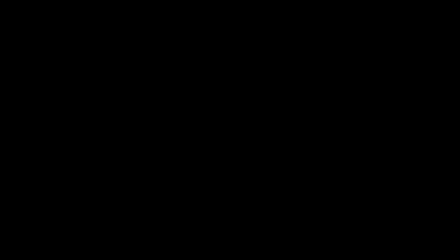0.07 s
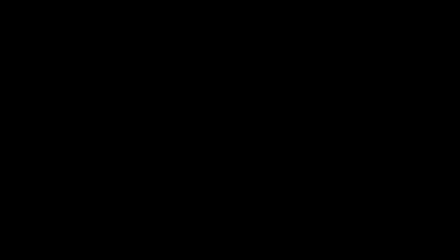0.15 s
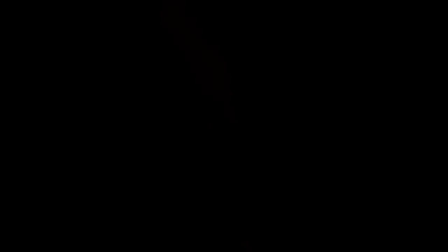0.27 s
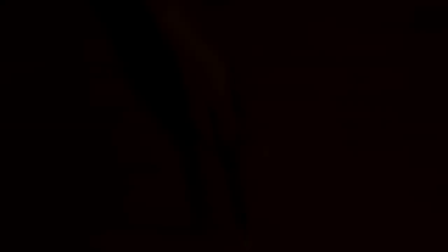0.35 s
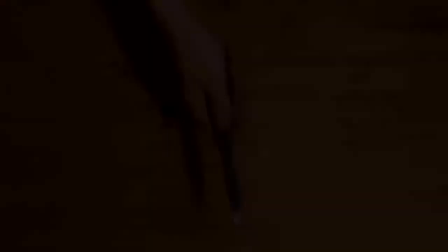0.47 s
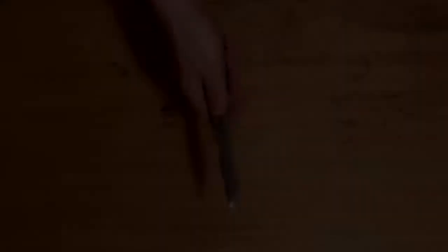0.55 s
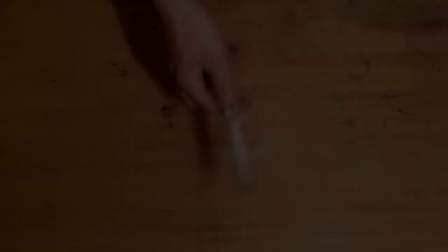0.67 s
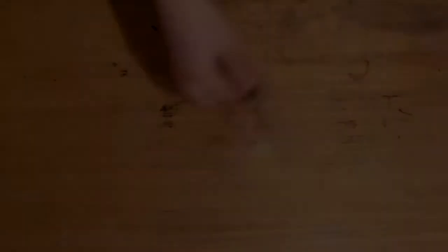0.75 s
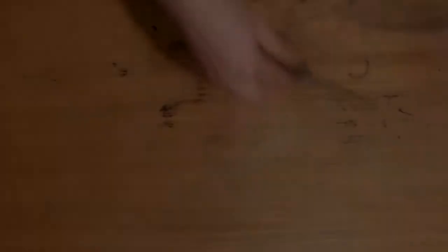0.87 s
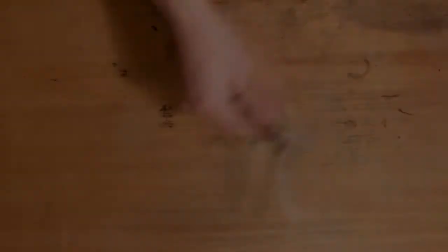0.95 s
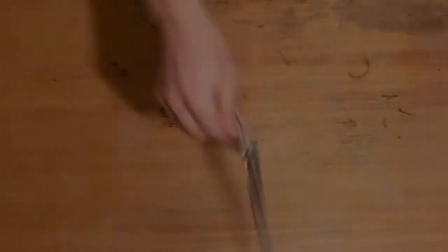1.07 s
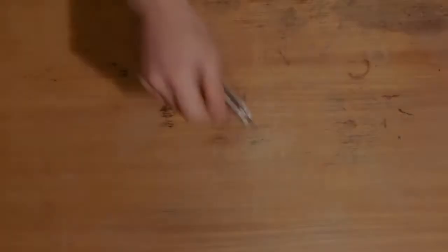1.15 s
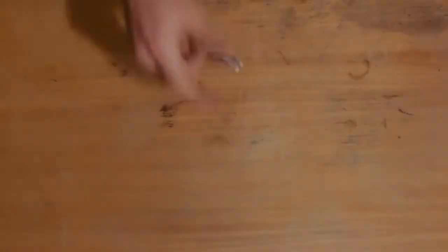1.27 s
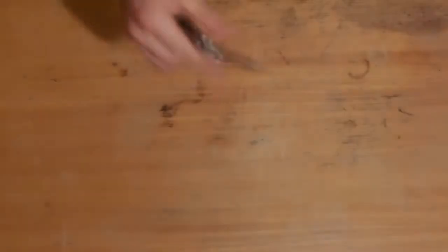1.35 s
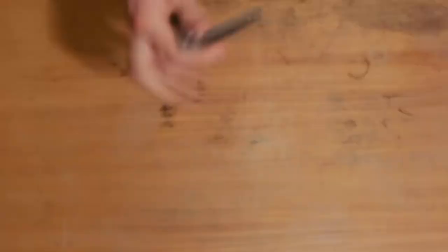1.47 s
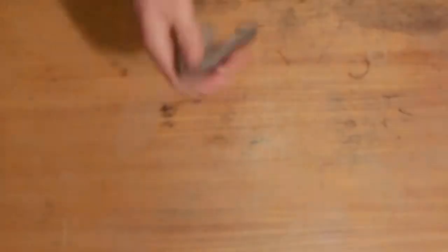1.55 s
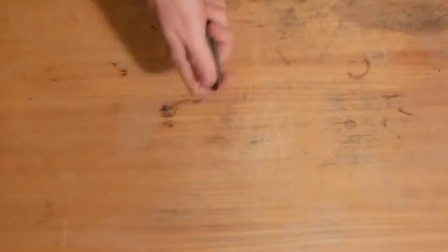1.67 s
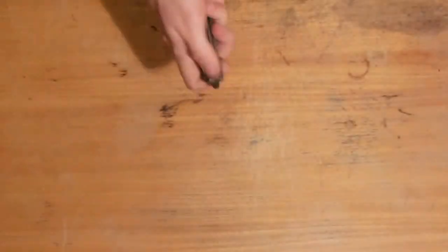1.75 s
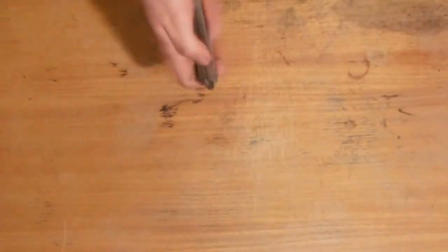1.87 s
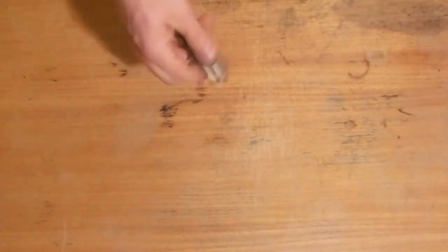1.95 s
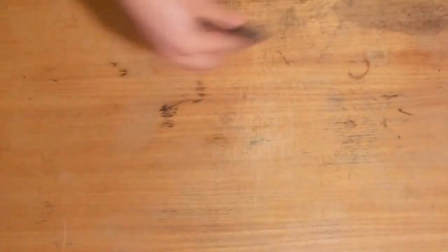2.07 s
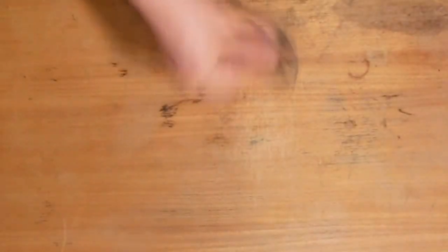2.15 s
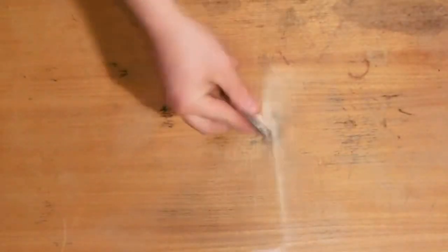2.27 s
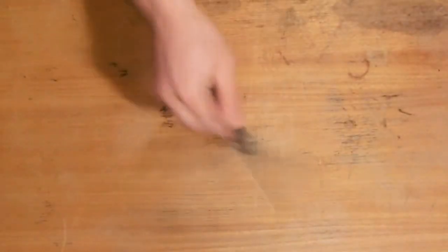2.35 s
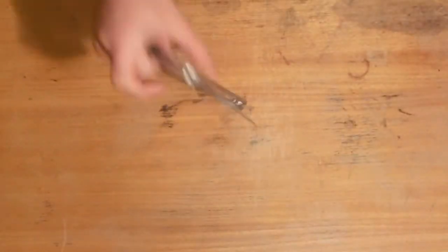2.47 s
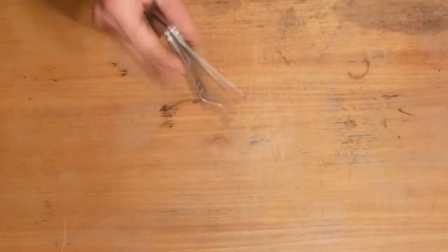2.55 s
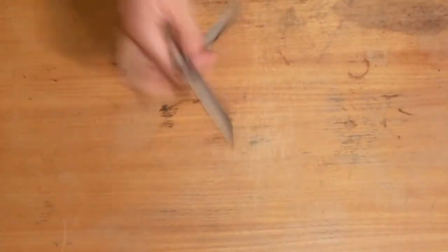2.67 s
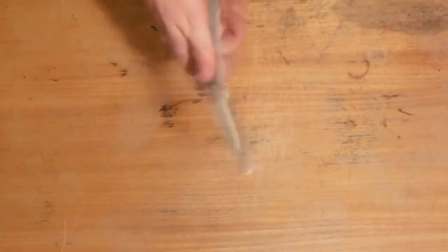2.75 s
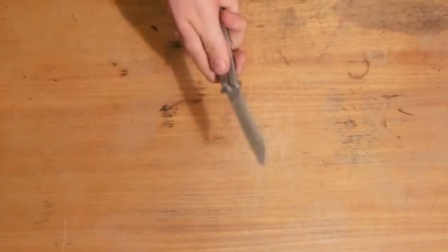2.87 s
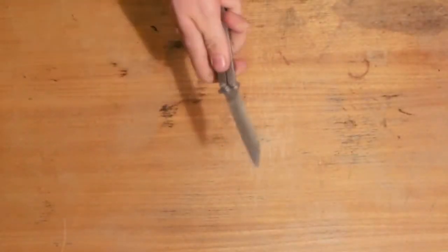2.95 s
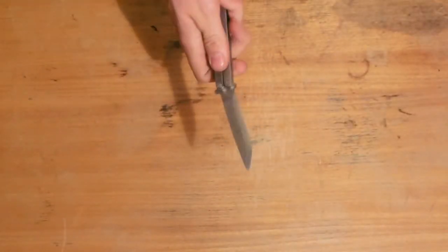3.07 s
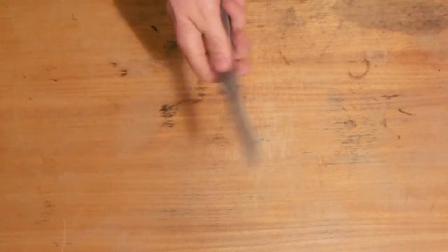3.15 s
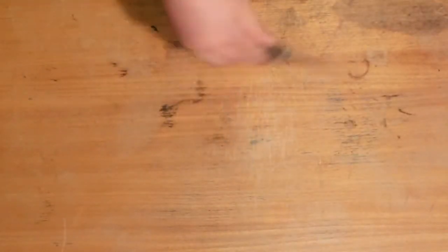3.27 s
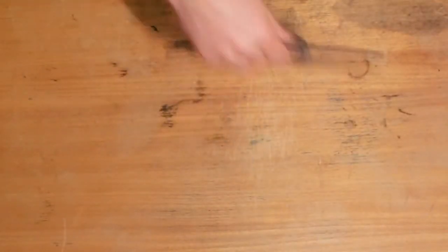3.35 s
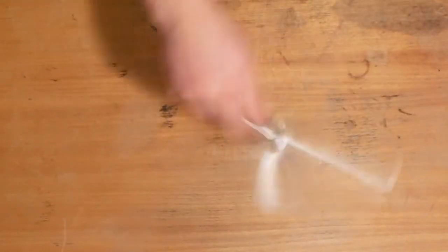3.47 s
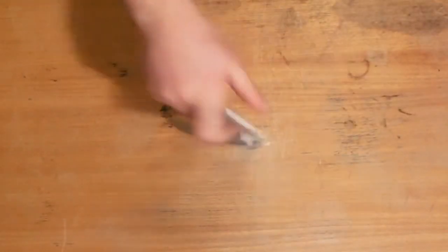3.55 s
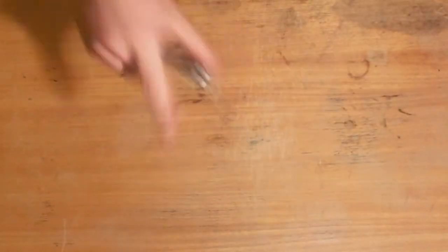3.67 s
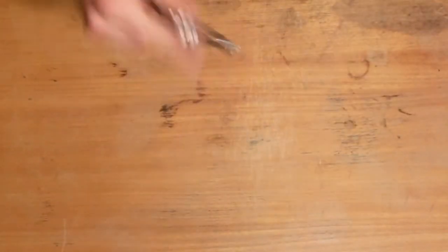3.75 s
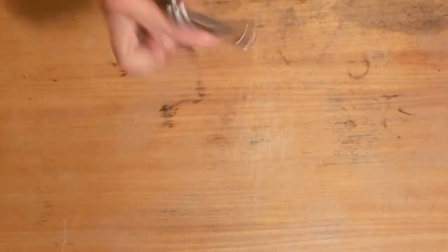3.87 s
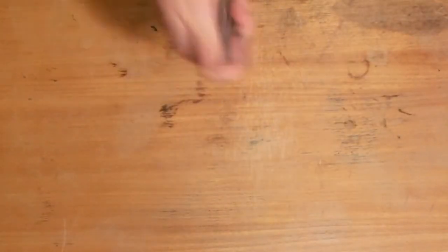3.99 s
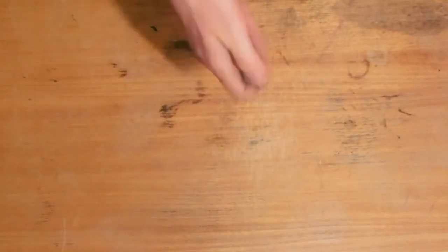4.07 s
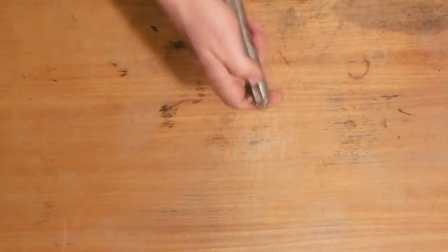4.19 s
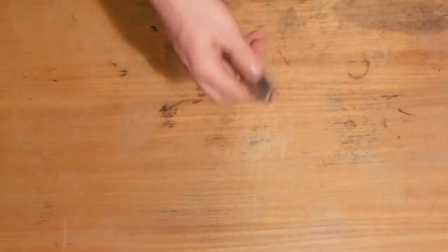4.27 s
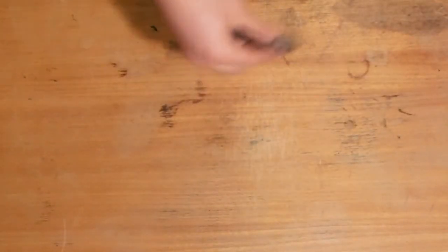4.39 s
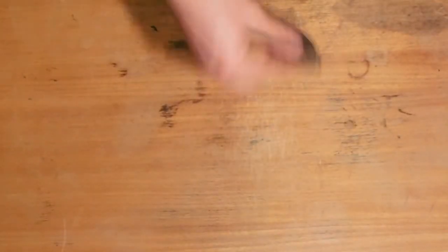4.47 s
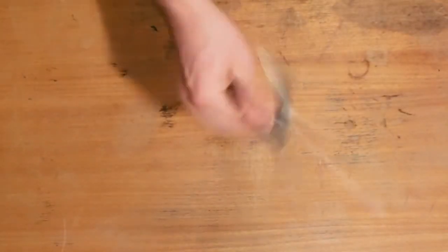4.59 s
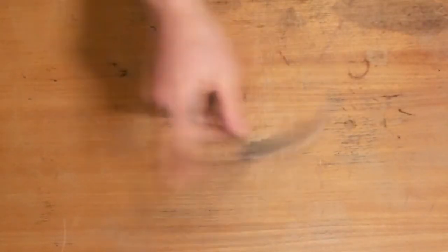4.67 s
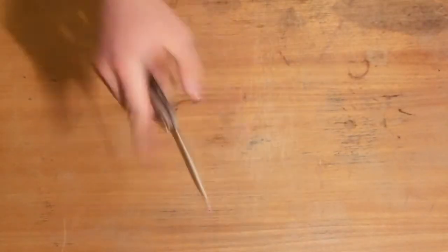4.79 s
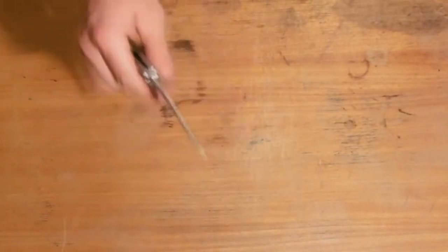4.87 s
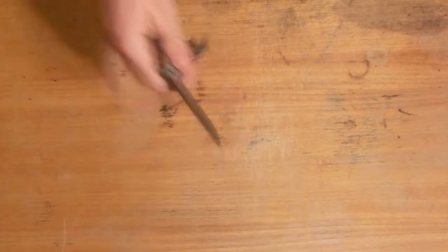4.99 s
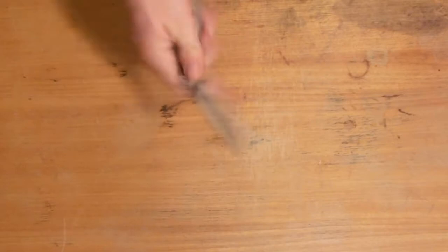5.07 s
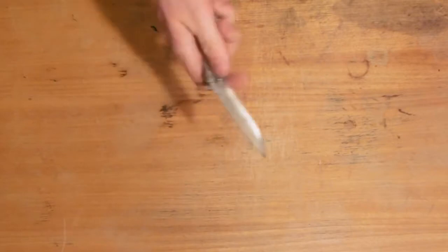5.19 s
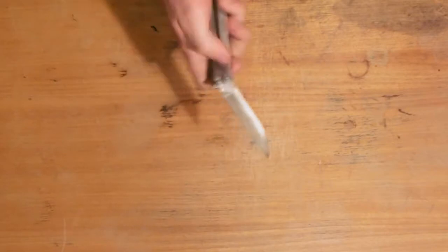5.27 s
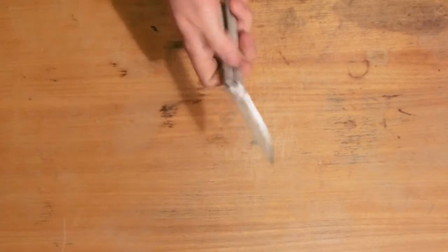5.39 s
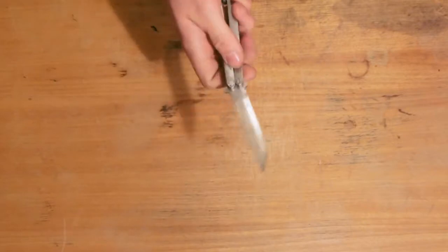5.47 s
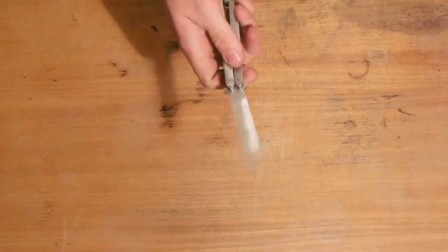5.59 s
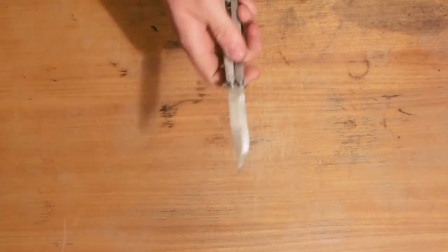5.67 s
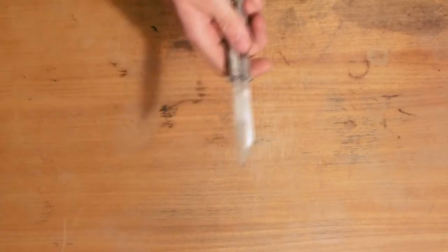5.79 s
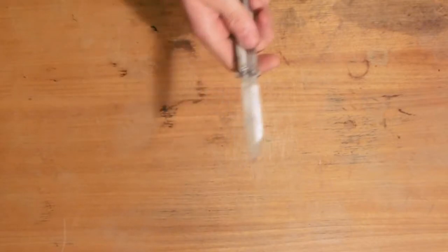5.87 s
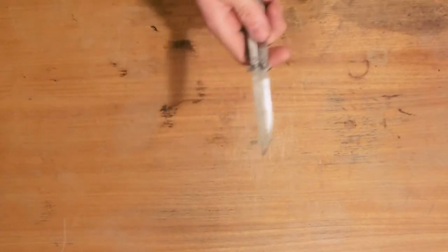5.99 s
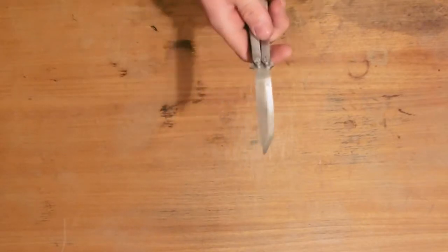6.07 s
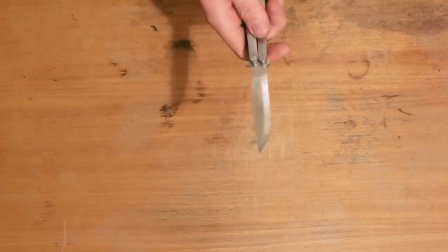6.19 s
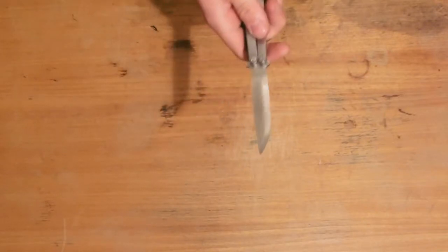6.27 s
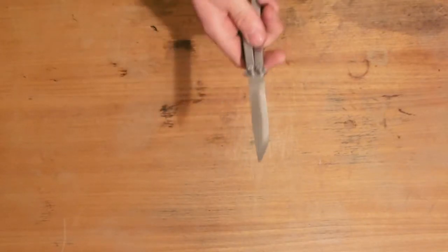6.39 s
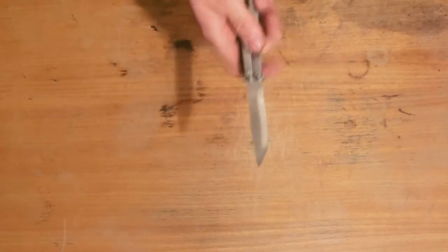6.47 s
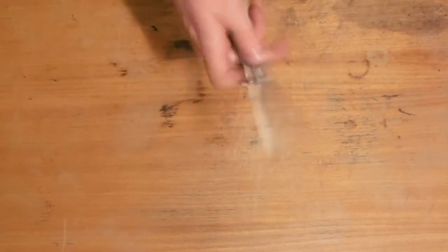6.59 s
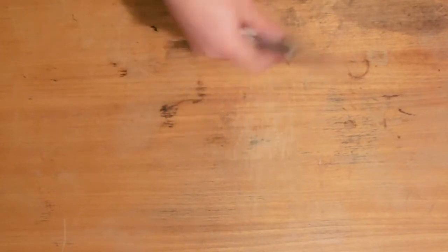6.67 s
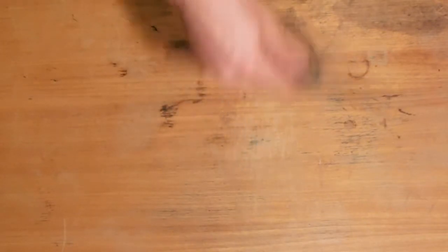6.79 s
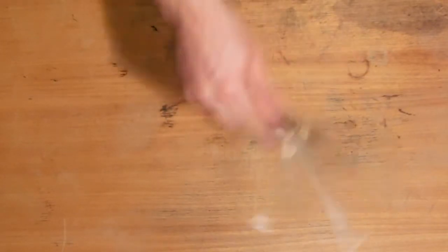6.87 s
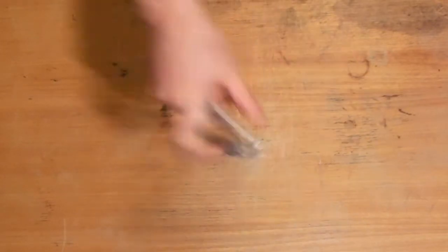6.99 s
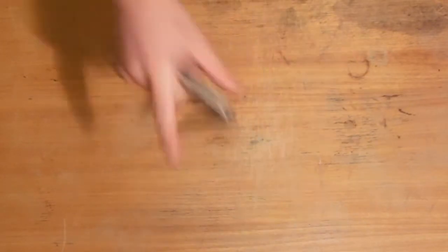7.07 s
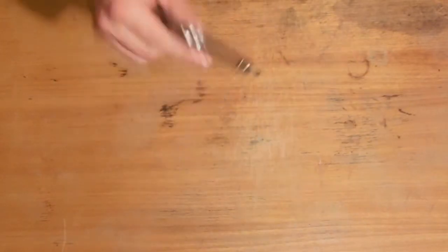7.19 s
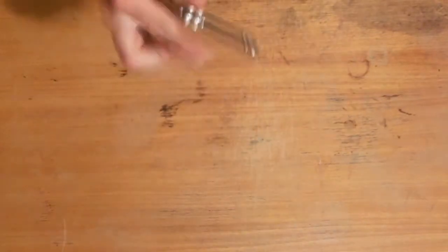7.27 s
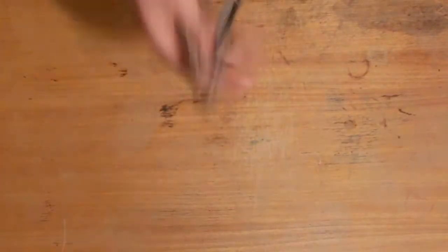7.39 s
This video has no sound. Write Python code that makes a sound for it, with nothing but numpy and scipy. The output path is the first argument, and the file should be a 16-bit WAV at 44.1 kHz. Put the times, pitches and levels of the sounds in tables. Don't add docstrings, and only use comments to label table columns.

```python
import sys
import numpy as np
from scipy import signal
from scipy.fft import rfft, irfft, next_fast_len
from scipy.io import wavfile
from scipy.ndimage import uniform_filter1d

SR = 44100
rng = np.random.default_rng(int(sys.argv[2]) if len(sys.argv) > 2 else 0)


def ratio(d):
    e = np.asarray(d, float) / 20
    return 10 ** e


def wav_out(sig):
    wavfile.write(sys.argv[1], SR, np.round(np.clip(np.atleast_2d(sig).T, -1, 1) * 32767).astype(np.int16))


N = 327663


def read(points, hz):
    f, value = np.transpose(points)
    return np.interp(np.log(hz + 1), np.log(f + 1), value)


def curve(rows, t):
    s, *columns = np.transpose(rows)
    return [np.interp(t, s, c) for c in columns]


def evened(x):
    return x / np.sqrt(np.mean(x ** 2) + 1e-20)


def add(mix, s, sound):
    part = mix[round(s * SR):][:len(sound)]
    part += sound[:len(part)]


def coloured(x, db_of):
    size = next_fast_len(len(x))
    gain = ratio(db_of(np.fft.rfftfreq(size, 1 / SR)))
    return irfft(rfft(x, size) * gain, size)[:len(x)]


def mode(t, hz, t60):
    return np.sin(2 * np.pi * hz * t) * ratio(-60 * t / np.clip(t60, .003, 1))


def ring(drive, t, hz, db, t60):
    response = (ratio(db) * mode(t, hz, t60)).sum(0)
    return evened(signal.fftconvolve(drive, response)[:len(t)])


def chatter(noise, t):
    bounce_db, swell_s = 2.5, .0027
    bounces = ratio(bounce_db * evened(uniform_filter1d(noise[1], size=40)))
    return noise[0] * bounces * (t / swell_s) ** 2 * np.exp(-t / swell_s)


def ping(db, hz, t60, grit):
    t = np.arange(grit.shape[1]) / SR
    sound = ring(chatter(grit, t), t, hz * np.array([[1], [1.012]]), 0, t60)
    return ratio(db - 8.5) * sound / abs(sound).max()


# (time [s], level [dB])
GAIN = [(0.0, -82.5), (0.14, -73), (0.33, -68), (0.89, -62), (1.45, -60), (1.63, -65.5), (2.07, -66.5),
        (2.73, -67.5), (3.81, -65.5), (4.82, -66), (5.94, -66), (7.43, -61)]


def gain_db():
    return curve(GAIN, np.arange(N) / SR)[0]


# (frequency [Hz], density [dB per Hz])
HISS = [(59, -57), (100, -4), (119, -3), (322, -4), (425, -3), (955, -2), (1110, -2.5), (1530, -3),
        (3010, -5), (11800, -13.5), (16200, -18.5)]


def hiss(level_db):
    noise = evened(coloured(rng.standard_normal(N), lambda hz: read(HISS, hz)))
    treble = coloured(noise, lambda hz: 20 * np.log10(hz / (hz + 4000) + 1e-9))
    return ratio(level_db + 8.5) * (noise + (ratio(-5) - 1) * treble)


# (frequency [Hz], density [dB per Hz])
RUMBLE = [(12, -43), (20, 12), (32, -7), (53, 15), (72, 3.5), (86, -22), (108, -3), (124, 10), (140, -57),
          (168, 6.5), (220, 4), (290, -20), (480, -120)]
# (start [s], length [s], lift [dB])
SURGES = [
    (0.35, 0.5, 4.5),
    (1.7, 0.59, 7.5),
    (3.347, 0.79, 4.5),
    (4.35, .45, 3.5),
    (5.4, 0.27, 2.5),
]


def rumble(level_db):
    swell_db, swell_s = 0.5, .15
    noise, drift = rng.standard_normal((2, N))
    noise = evened(coloured(noise, lambda hz: read(RUMBLE, hz)))
    drift = evened(coloured(drift - drift.mean(), lambda hz: -20 * np.log10(1 + (hz * swell_s) ** 2)))
    surge_db = np.zeros(N)
    for s, length, db in SURGES:
        add(surge_db, s, db * signal.windows.tukey(round(length * SR), .6))
    return ratio(surge_db - 75 + level_db + 65 + swell_db * drift) * noise


# (start [s], length [s], level [dB])
THROBS = [
    (0.49, 0.063, -63.5),
    (0.829, 0.045, -57.5),
    (0.906, 0.19, -62.5),
    (1.115, 0.22, -60),
    (1.27, 0.19, -63),
    (1.52, 0.12, -60),
    (1.67, 0.064, -63),
    (1.79, 0.077, -63.5),
]


def drone():
    centre_hz, width_hz = 386, 61
    tone = evened(coloured(rng.standard_normal(N),
                           lambda hz: -20 * np.log10(1 + (2 * (hz - centre_hz) / width_hz) ** 2)))
    throb = np.zeros(N)
    for s, length, db in THROBS:
        add(throb, s, ratio(db) * signal.windows.tukey(round(length * SR), .7))
    return throb * tone


# (time [s], peak [dB], leading ring [Hz], handle knock [dB], room share [dB])
SNAPS_EARLY = [(0.9768, -35.5, 2000, -6, -12), (1.0929, -32.5, 2220, -10, 2.5),
               (1.1105, -25, 4860, -7, 1.5), (1.2457, -38.5, 6000, -21, -1),
               (1.3738, -30.5, 4800, -27, -3.5), (1.4552, -26, 1650, -14.5, 0.5),
               (1.527, -24, 4700, -11.5, 3), (1.637, -5.5, 4820, -26, -6.5), (1.9181, -26, 5230, -16, -3),
               (1.9686, -24.5, 5400, -12.5, -3), (2.151, -39, 2610, -11, -0.5), (2.379, -26, 1250, -9, -2),
               (2.655, -31.5, 3970, -8.5, -4.5), (2.7453, -15.5, 5330, -12, -1.5),
               (3.249, -40.5, 5300, -25, -5), (3.3575, -43.5, 2270, -22, 3), (3.4212, -36, 3660, -9, -5),
               (3.6156, -36.5, 4550, -9, -6), (3.688, -35.5, 5700, -19, -3), (3.795, -35, 1530, -7.5, -2.5)]
SNAPS_LATE = [(3.9634, -27, 2300, -8, -5), (3.986, -28, 3750, -11, 4), (4.0107, -8.5, 4840, -30, -18),
              (4.2227, -39, 5800, -37, -1), (4.2802, -33, 5730, -13, -1), (4.326, -38, 3400, -25, -10),
              (4.4684, -34, 2100, -14, -6.5), (4.5591, -25.5, 1470, -10, -4), (4.75, -41, 6140, 0, -3),
              (4.8036, -32, 6050, -14, 1), (4.9973, -36, 2250, -31, 1), (5.086, -18.5, 4970, -14.5, -4),
              (6.556, -47, 1100, -15, -8), (6.6876, -39, 6800, -7, -1), (6.9394, -34.5, 4870, -4, -1.5),
              (7.1783, -36, 6000, -21, -5), (7.274, -43, 4730, -21, 0), (7.394, -34, 3400, -36, 0)]
# (time [s], peak [dB], leading
# ring [Hz], room share [dB])
FURTHER_CONTACTS = [(0.8157, -37.5, 3570, 0), (1.2997, -26.5, 1840, -1), (1.4708, -30.5, 1970, -7),
                    (1.5715, -22.5, 1260, -2.5), (1.6005, -19.5, 4360, 3), (1.6271, -21, 4460, 3),
                    (1.8344, -46, 4100, -17), (2.276, -41, 3070, -4), (2.3214, -45, 3050, -1),
                    (2.498, -49.5, 2220, 10), (2.5175, -40.5, 2130, -1.5), (2.574, -39.5, 3500, -3),
                    (2.719, -44.5, 1910, 11), (3.3708, -44, 2050, -13), (3.54, -46.5, 1380, 6),
                    (2.738, -28, 5000, -13), (3.6364, -38, 4300, -3), (3.854, -43.5, 3600, 5.5),
                    (4.5952, -30.5, 1420, -2.5), (4.6541, -40, 2476, -1.5), (4.8871, -32.5, 7000, -1),
                    (5.124, -25.5, 2450, -8), (5.328, -43.5, 2090, -7), (5.078, -38, 4630, -11),
                    (6.8604, -38.5, 1280, -3), (7.0092, -41, 4550, -11), (7.099, -47, 1110, -5),
                    (7.216, -43, 1210, -7), (7.3078, -36, 3720, 3), (7.4224, -29, 5580, -4)]
EDGE_DB = {"handle": -9.5, "blade": -4, "slam": -4.5}
FURTHER_KNOCK_DB = {"handle": -11, "blade": -13.5}


def contacts():
    handle_top_hz, slam_db = 2500, -21

    def part(hz):
        return "handle" if hz < handle_top_hz else "blade"

    rattles = [(s, db, hz, FURTHER_KNOCK_DB[part(hz)], wet) for s, db, hz, wet in FURTHER_CONTACTS]
    return [(s, db, hz, knock, EDGE_DB["slam" if db > slam_db else part(hz)], wet)
            for s, db, hz, knock, wet in SNAPS_EARLY + SNAPS_LATE + rattles]


# (frequency [Hz], width [Hz], level [dB])
STEEL = [(3520, 70, 0), (3800, 90, -6), (4330, 80, -4), (4550, 100, 0), (4730, 90, -3), (5140, 80, -3),
         (5380, 80, -4), (5720, 90, -6), (6150, 100, -8), (6810, 100, -4), (7250, 100, -7), (8030, 100, -5),
         (8400, 100, -5), (9000, 100, -3), (9450, 100, -8), (9860, 100, -4), (10500, 90, -2),
         (11500, 110, -8), (12320, 110, -6), (13360, 120, -11), (14300, 130, -12), (15200, 130, -8)]
# (frequency [Hz], width [Hz], level [dB])
HANDLES = [(1260, 70, -2), (1420, 70, -4), (1620, 70, 0), (1900, 80, -1), (2250, 80, -2), (2650, 90, -5),
           (3050, 90, -5)]
# (frequency [Hz], density [dB per Hz])
CRACK = [(410, -70.5), (700, -69), (1530, -3), (3210, -27), (3420, -50), (4560, 3.5), (6150, 5.5),
         (6740, 4.5), (10200, 3), (14700, -13.5), (15700, 1.5)]


def clack(row, luck, noise):
    scatter_db, held = 3.2, .6
    _, peak_db, lead_hz, knock_db, edge_db, _ = row
    t = np.arange(noise.shape[1]) / SR
    drive = chatter(noise, t)
    sound = evened(coloured(drive, lambda hz: read(CRACK, hz)))
    for modes, set_db, chance in (STEEL, -8, luck), (HANDLES, -4, luck[::-1]):
        hz, width, db = np.transpose(modes)[:, :, None]
        strength_db = db + scatter_db * chance[:len(modes), None]
        sound = sound + ratio(set_db) * ring(drive, t, hz, strength_db, held * 3.4 / width)
    cluster_hz = lead_hz * np.array([[.93], [1], [1.07]])
    sound = sound + ratio(-6) * ring(drive, t, cluster_hz, np.array([[-4], [0], [-4]]), .014)
    grip = [(500, knock_db - 42), (1150, knock_db + 0.5), (2400, knock_db + 10), (3400, 0.0055),
            (5800, 0), (7800, edge_db + 9), (16000, edge_db + 17)]
    sound = coloured(np.roll(sound, 200), lambda hz: read(grip, hz))[200:]
    return ratio(peak_db) * sound / np.sqrt(uniform_filter1d(sound ** 2, size=130).max() * 6)


def clacks():
    direct, feed, rows = np.zeros(N), np.zeros((3, N)), contacts()
    luck = rng.standard_normal((len(rows), 3, len(STEEL)))
    noise = rng.standard_normal((len(rows), 3, 2, 1800))
    for k, row in enumerate(rows):
        draws = [clack(row, *pair) for pair in zip(luck[k], noise[k])]
        start = row[0] - .003
        add(direct, start, draws[0])
        for wall, sound in zip(feed, draws):
            add(wall, start, ratio(row[5]) * sound / np.sqrt(3))
    return direct, feed


# (frequency [Hz], reverberation time [s])
ROOM = [(1000, 0.2), (2600, 0.27), (7000, 0.2), (15000, 0.15)]


def room(count, gap=0.001, build=0.013):
    signs = rng.choice([-1., 1.], (count, SR // 2))
    taps = signs * (rng.random((count, SR // 2)) < .12)
    hz, t, z = signal.stft(taps, SR, nperseg=128)
    tail = signal.istft(z * ratio(-60 * t / read(ROOM, hz)[:, None]), SR, nperseg=128)[1]
    t = np.arange(tail.shape[1]) / SR
    tail = tail * np.clip((t - gap) / build, 0, 1)
    return tail / np.linalg.norm(tail, axis=1, keepdims=True)


# (time [s], peak [dB], ringing [Hz])
TICKS = [(1.108, -33, 6800), (1.114, -29, 6890), (1.1198, -25, 9860), (1.244, -45, 9650),
         (1.2484, -40, 10160), (1.2966, -39, 3700), (1.311, -32, 9690), (1.3147, -36, 5700),
         (1.4507, -45, 5000), (1.4712, -34, 4800), (1.528, -31, 8960), (1.555, -32, 4570),
         (1.5587, -33, 5300), (1.62, -31, 8600), (1.6376, -18, 4590), (1.6402, -18, 8100),
         (1.7329, -40, 3600), (1.9152, -39, 9050), (1.9201, -27.5, 10080), (1.963, -36, 6600),
         (1.9727, -30.5, 10330), (1.9889, -40, 6600), (2.3873, -29.5, 8700), (2.4043, -38, 3660),
         (2.6566, -39, 7360), (2.6638, -34.5, 8830), (2.7428, -29, 9050), (2.747, -23, 9400),
         (2.7522, -29, 7200), (2.7917, -29, 5730), (3.69, -42, 8570), (3.8096, -42, 5080),
         (3.9737, -33, 10380), (3.99, -31, 10400), (4.0079, -23, 4500), (4.0124, -16.5, 8850),
         (4.0177, -23, 10400), (4.0256, -24, 5070), (4.22, -42, 9950), (4.2244, -36.5, 11500),
         (4.282, -38, 11100), (4.2908, -42, 9000), (4.4685, -40, 10700), (4.4732, -37.5, 9000),
         (4.5596, -27.5, 7500), (4.8038, -37, 8440), (4.8818, -46, 12060), (4.8961, -42, 9100),
         (4.9993, -41, 12300), (5.0045, -42, 10420), (5.0876, -21, 9050), (5.0915, -27, 4700),
         (6.686, -38, 6850), (6.693, -36.5, 6850), (6.865, -44, 8440), (6.9397, -35.5, 15200),
         (7.3102, -44, 10400), (7.3232, -43, 5400), (7.3898, -40, 8610), (7.3944, -29.5, 8800)]
# (frequency [Hz], gain [dB])
TICK_COLOUR = [(500, -80), (1400, -42), (3000, -10), (5000, -2), (9500, -3), (13000, -6), (16000, -10)]


def touches():
    rise_s, fall_s, t60, ring_db = .0003, .0019, .018, 1.5
    out, t = np.zeros(N), np.arange(1024) / SR
    for (s, db, hz), grit in zip(TICKS, rng.standard_normal((len(TICKS), len(t)))):
        drive = np.roll(grit * np.tanh(t / rise_s) * np.exp(-t / fall_s), shift=132)
        spot_hz = hz * np.array([[.975], [1], [1.03]])
        spot = ring(drive, t, spot_hz, np.array([[-5], [0], [-5]]), t60)
        tick = coloured(evened(drive) + ratio(ring_db) * spot, lambda f: read(TICK_COLOUR, f))
        add(out, s - .004, ratio(db) * tick / np.sqrt(2 * uniform_filter1d(tick ** 2, size=40).max()))
    return out


# (time [s], peak [dB], frequency [Hz])
PINGS = [(1.113, -19, 6810), (1.247, -34, 9860), (1.3733, -37, 10160), (1.5696, -26, 6640),
         (1.631, -16, 10300), (1.6376, -18, 10650), (1.917, -25, 10000), (2.6624, -39, 8620),
         (2.7184, -35, 10500), (2.7456, -17, 7060), (3.4213, -37, 9300), (3.6157, -37, 7630),
         (3.6885, -42, 8400), (3.9607, -28, 6800), (4.01, -30, 6600), (4.3256, -39, 9900),
         (4.4699, -26, 10500), (4.5597, -22, 10380), (4.7491, -35, 6400), (4.998, -33, 10500),
         (5.0854, -22.5, 8560), (5.1208, -32, 9000), (6.5555, -38, 10400), (6.6875, -28, 6830),
         (6.9217, -40, 10400), (6.939, -33, 12300), (7.177, -33, 10000), (7.2704, -33.5, 8930),
         (7.3926, -25, 8360)]
# (time [s], peak [dB], frequency [Hz])
LONG_PINGS = [
    (1.3, -31, 9500),
    (1.9709, -30.5, 6590),
    (2.7695, -34, 8770),
    (4.886, -34, 8920),
]
# (time [s], peak [dB], frequency [Hz], decay t60 [s])
RINGS = [(1.641, -15, 3510, 0.099), (2.751, -29, 4800, 0.23), (3.985, -19.5, 3700, 0.033),
         (3.963, -24.5, 3520, 0.07), (1.641, -15.5, 4530, 0.089), (3.421, -40, 3660, 0.045),
         (4.01, -13.5, 4530, 0.062), (4.4707, -31, 10630, .042), (4.5581, -23, 7410, .024),
         (4.6565, -37, 8790, .11), (4.9945, -35.5, 2285, .041), (7.0105, -39, 4540, .055),
         (7.0975, -41, 6040, .052), (7.2715, -43, 4685, .065), (2.3, -41, 11000, .06),
         (3.366, -40, 15000, 0.035), (4.223, -35, 5780, 0.12), (4.2228, -22, 9970, 0.014),
         (4.559, -29, 1930, 0.019), (7.5, -45, 9400, 0.05), (7.1, -37.5, 8440, 0.05),
         (6.942, -40, 6000, .03), (6.688, -37.5, 2040, 0.044), (1.302, -29.5, 1575, 0.16),
         (4.017, -16.5, 5200, 0.059)]


def pings():
    direct, feed = np.zeros(N), np.zeros((3, N))
    rows = [(*row, 0.03) for row in PINGS] + [(*row, 0.12) for row in LONG_PINGS] + RINGS
    for k, ((s, db, hz, t60), grit) in enumerate(zip(rows, rng.standard_normal((len(rows), 2, 4096)))):
        sound = ping(db, hz, t60, grit)
        add(direct, s - .003, sound)
        add(feed[k % 3], s - .003, ratio(-10) * sound)
    return direct, feed


# (time [s], peak [dB], frequency [Hz], decay t60 [s])
MORE_RINGS = [(1.133, -30.5, 10500, 0.13), (1.135, -33, 14900, .07), (1.301, -31, 5700, 0.076),
              (1.53, -33, 10560, .1), (1.645, -22, 10480, 0.19), (1.658, -23, 3510, .15),
              (1.966, -29, 14100, .13), (1.99, -35, 10100, 0.093), (2.151, -40, 10500, .06),
              (2.155, -42, 6900, .06), (2.719, -38, 8900, .06), (2.772, -26, 5700, .1),
              (2.79, -28, 5620, .1), (2.801, -36, 9040, 0.16), (3.252, -43, 10500, 0.091),
              (3.253, -41, 8600, .04), (3.45, -49, 10500, .1), (3.54, -49, 10500, .12),
              (3.568, -46, 5640, .08), (3.797, -41, 9870, .04), (3.797, -44, 6720, .07),
              (3.998, -31, 3800, .04), (3.975, -29, 6800, .15), (4.016, -24, 6770, .08),
              (4.293, -41, 5400, .09), (4.282, -42, 14500, .08), (4.47, -36, 12400, 0.14),
              (4.5, -45, 9000, .08), (5.015, -36, 15200, .07), (5.09, -26, 10450, .1),
              (6.862, -47, 10800, 0.11), (6.94, -40, 10500, .06), (7.008, -44, 8500, .06),
              (7.2, -44, 10540, .06), (7.212, -39, 8900, .04), (7.271, -42, 10800, .06),
              (7.312, -44, 10700, .09), (7.396, -36, 12300, .06), (1.31, -33, 2000, .08),
              (1.458, -37, 1950, .06), (2.382, -33, 1900, .07), (2.39, -35, 3600, .09),
              (2.747, -29, 1640, .07), (4.562, -36, 1330, .08), (1.655, -24, 5370, .1),
              (1.645, -25, 6500, .08), (4.05, -30, 5400, .06), (5.124, -30, 3700, .04)]


def more_rings():
    out = np.zeros(N)
    for (s, *row), grit in zip(MORE_RINGS, rng.standard_normal((len(MORE_RINGS), 2, 5000))):
        add(out, s - .003, ping(*row, grit))
    return out


# (time [s], level [dB], frequency [Hz], decay t60 [s])
THUDS = [
    (1.633, -49, 151, 0.033),
    (3.066, -61, 566, 0.24),
    (7.191, -59, 300, 0.28),
]


def thuds():
    out = np.zeros(N)
    for s, db, hz, t60 in THUDS:
        add(out, s, ratio(db) * mode(np.arange(8000) / SR, hz, t60))
    return out


# (frequency over centre [ratio], density [dB per Hz])
LATCH = [(0.3, -35), (0.6, -8), (0.85, -5.5), (1.02, -3), (1.2, -7.5), (1.9, -13.5), (2.5, -19), (3.5, -11)]
# (start [s], level [dB], held [s], centre [Hz])
LATCH_RATTLES = [
    (1.649, -32.5, 0.024, 4760),
    (2.757, -39.5, 0.054, 5540),
    (4.022, -35.5, 0.016, 4600),
    (5.115, -41.5, 0.013, 5170),
]


def latch():
    ticks_per_s, sizes_db, rise_s, t60 = 5000, 2.2, 0.01, 0.12
    out, t = np.zeros(N), np.arange(6000) / SR
    chances = rng.random((len(LATCH_RATTLES), 3, len(t)))
    for (s, db, held, centre_hz), (when, size, sign) in zip(LATCH_RATTLES, chances):
        sizes = ratio(-sizes_db * np.log(size + 1e-3))
        ticks = (when < ticks_per_s / SR) * sizes * np.sign(sign - .5)
        spray = evened(coloured(ticks, lambda hz: read(LATCH, hz / centre_hz)))
        fall = ratio(db - 60 * np.maximum(t - held, 0) / t60)
        add(out, s, fall * np.minimum(t / rise_s, 1) * spray)
    return out


# (time [s], pitch [Hz], level [dB])
SQUEAK = [
    (2.2, 3030, -70),
    (2.21, 3024, -52),
    (2.228, 3050, -48),
    (2.24, 3070, -51),
    (2.256, 3068, -41.5),
    (2.285, 3055, -55),
    (2.298, 3060, -79),
    (2.312, 3060, -49),
    (2.33, 3080, -64),
]
# (multiple [ratio], level [dB])
SQUEAK_ORDERS = [(1, -1.5), (2, -17), (3, -19), (4, -17)]


def squeak():
    t = np.arange(SQUEAK[0][0], SQUEAK[-1][0], 1 / SR)
    hz, db = curve(SQUEAK, t)
    waver, *grips = (evened(uniform_filter1d(v, size=250)) for v in rng.standard_normal((5, len(t))))
    turns = np.cumsum(hz * (1 + 0.0032 * waver)) / SR
    tone = np.zeros(len(t))
    for (k, order_db), grip in zip(SQUEAK_ORDERS, grips):
        tone += ratio(order_db + 3 * np.sqrt(k) * grip) * np.sin(2 * np.pi * k * turns)
    out = np.zeros(N)
    add(out, t[0], np.sqrt(2) * tone * ratio(db) * signal.windows.tukey(len(t), .1))
    return out


# (start [s], length [s], from [Hz], to [Hz], level [dB])
WHINES = [
    (6.338, 0.36, 1030, 1024, -66.5),
    (7.07, 0.122, 1148, 1084, -61),
]


def whines():
    out = np.zeros(N)
    for s, length, from_hz, to_hz, db in WHINES:
        hz = np.linspace(from_hz, to_hz, round(length * SR))
        flicker = evened(uniform_filter1d(rng.standard_normal(len(hz)), size=700))
        level = np.sqrt(2) * ratio(db - 1.5 + 4 * flicker) * signal.windows.tukey(len(hz), .4)
        add(out, s, level * np.sin(2 * np.pi * np.cumsum(hz) / SR))
    return out


def scene():
    direct, feed = clacks()
    ping_direct, ping_feed = pings()
    pivot, loose, ticks, rings = squeak(), latch(), touches(), more_rings()
    level_db = gain_db()
    bed = hiss(level_db) + rumble(level_db) + drone() + whines() + thuds()
    feed = feed + ping_feed + ratio(-11) * pivot / 3 + ratio(-14.5) * loose
    feed = feed + ratio(-4.5) * ticks / 3 + ratio(-12) * rings / 3
    tail = signal.oaconvolve(feed, room(count=len(feed)), axes=1)[:, :N].sum(0)
    mono = direct + ping_direct + pivot + loose + ticks + rings + tail + bed
    return np.array([mono, mono])


FRAME_MARKS = [
    1.533,
    2.741,
    4.219,
    4.466,
    4.746,
    6.562,
    6.694,
    7.41,
]


def side_frames():
    hop, grid = 725, -160
    middles = (grid + hop * np.arange(N // hop + 1)) / SR
    late = middles[:, None] - np.r_[np.array(SNAPS_EARLY + SNAPS_LATE)[:, 0], FRAME_MARKS]
    short = ((late > -.0159) & (late < .0112)).any(axis=1)
    before, after = np.roll(short, 1), np.roll(short, -1)
    return middles[1:][(~short & (before != after))[1:]]


def roll_off(x):
    return signal.sosfilt(signal.butter(12, 16500, fs=SR, output="sos"), x)


def record(dry):
    frame, edge_hz, split_hz = 1450, 15650, 6900
    moved_share, side_db = 0.74, -0.7
    low_pass = signal.firwin(511, edge_hz, window=("kaiser", 9), fs=SR)
    mid = signal.oaconvolve(dry[0], low_pass, "same")
    high_pass = signal.firwin(255, split_hz, pass_zero=False, fs=SR)
    treble = np.pad(signal.oaconvolve(mid, high_pass, "same"), (0, frame))
    window, moved = np.hanning(frame), np.zeros((2, N))
    for k, s in enumerate(side_frames()):
        start = round(s * SR) - frame // 2
        add(moved[k % 2], start / SR, window * treble[start:start + frame])
    mid = mid - moved_share * moved.sum(0)
    side = ratio(side_db) * signal.hilbert(moved[0] - moved[1], next_fast_len(N)).imag[:N]
    return roll_off(np.array([mid + side, mid - side]))


dry = scene()
out = record(dry)
wav_out(out)
```